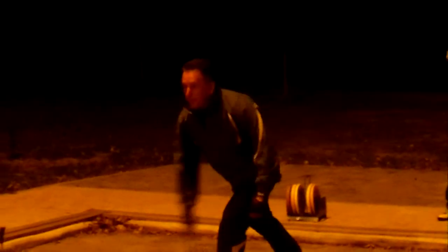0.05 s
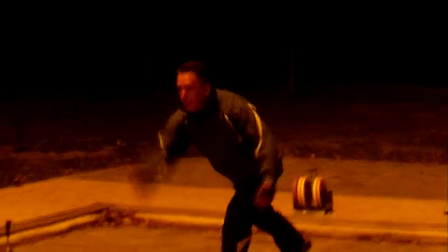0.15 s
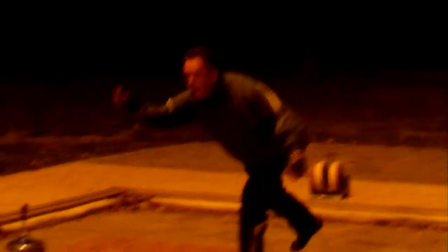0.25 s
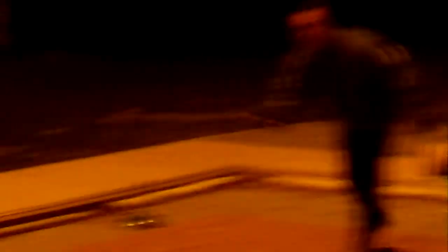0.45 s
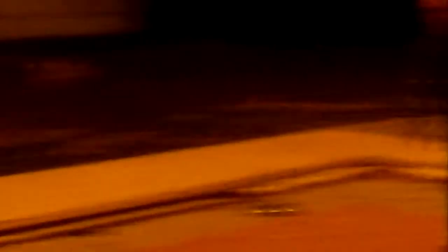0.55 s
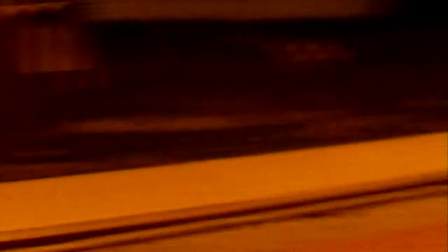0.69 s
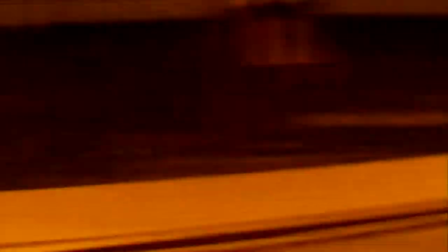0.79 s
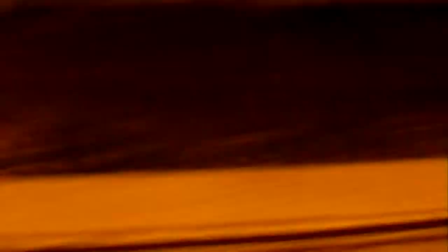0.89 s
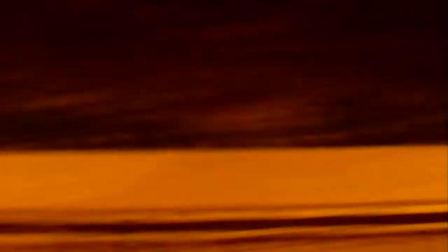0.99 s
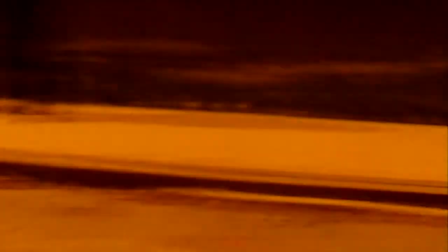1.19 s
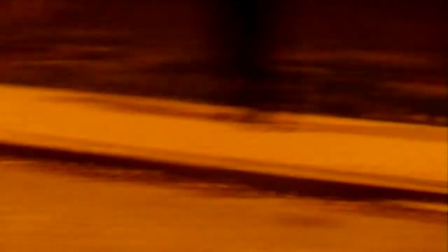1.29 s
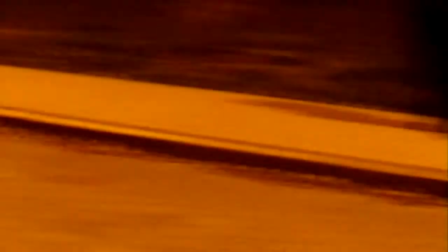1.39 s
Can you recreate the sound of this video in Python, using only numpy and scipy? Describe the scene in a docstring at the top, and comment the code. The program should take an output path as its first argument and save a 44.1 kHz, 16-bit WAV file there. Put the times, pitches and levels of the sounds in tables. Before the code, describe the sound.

A heavy object hits paved ground with a sharp double knock, bounces lightly a few times, then slides away in dry clacks and short gritty scrapes. It is outdoors, with a faint echo and a low background rumble.

```python
"""A heavy object is bowled along paved ground, outdoors at night. It lands with a double knock, bounces
a few times, then skitters away in dry clacks and short gritty scrapes over the soft rush of its slide.
Each impact excites damped resonances and sets the object's normal modes ringing briefly. The ground
scatters the knocks and scrapes, a faint echo follows, and a low rumble lies beneath."""
import sys
import numpy as np
from scipy import signal
from scipy.fft import rfft, irfft
from scipy.io import wavfile

SR = 44100
rng = np.random.default_rng(int(sys.argv[2]) if len(sys.argv) > 2 else 0)


def dump_mix(stems):
    """Bounce the given channels to the path in sys.argv[1] as a 16-bit WAV at rate SR."""
    frames = np.atleast_2d(stems).T  # one column per channel
    limited = np.clip(frames, -1, 1)  # hard clip at full scale
    pcm = np.round(limited * 32767).astype(np.int16)
    wavfile.write(sys.argv[1], SR, pcm)


N = 63945
T = np.arange(N) / SR

# spectrum of the outdoor background: f/Hz, level/dB
AMBIENT_SPECTRUM = [(20, -6.5), (55, -1.5), (90, -12.5), (150, -16.5), (310, -22), (510, -30), (870, -29.5),
                    (1700, -36.5), (5700, -52), (11400, -51.5), (16000, -61)]
# spectrum of the distant echo: f/Hz, level/dB
ECHO_SPECTRUM = [(200, -29), (500, 12.5), (900, -18), (1400, 6), (4000, 3.5), (9000, 2), (15000, 2)]
# envelope of the sliding friction: t/s, level/dB
FRICTION_ENVELOPE = [(.24, -78), (.31, -58), (.42, -49), (.55, -49), (.8, -53.5), (1.1, -53.5),
                     (1.45, -53.5)]
# spectrum of the sliding friction: f/Hz, level/dB
FRICTION_SPECTRUM = [(100, 2), (190, 1.5), (290, 0.5), (470, -11), (700, -9), (890, -1), (1250, -12.5),
                     (2000, -10.5), (2600, -25), (3700, -17.5), (8000, -30), (15000, -61)]
# scrapes over grit: t/s, duration/s, level/dB
SCRAPE_EVENTS = [(0.411, 0.01, -36.5), (0.53, 0.0034, -47), (0.541, 0.0054, -37.5), (0.667, 0.014, -43.5),
                 (.769, 0.0082, -44), (.8062, 0.0013, -30), (.816, 0.0059, -41.5), (0.903, 0.014, -36),
                 (.963, 0.0072, -43.5), (1.009, 0.0048, -33.5), (1.033, 0.0056, -45),
                 (1.111, 0.0021, -33.5), (1.115, 0.0077, -46), (1.166, 0.0068, -39.5),
                 (1.229, 0.00073, -35.5), (1.255, 0.0038, -39.5), (1.282, 0.0073, -42),
                 (1.303, 0.0023, -37.5), (1.317, 0.0053, -37)]
# spectrum of a scrape: f/Hz, level/dB
SCRAPE_SPECTRUM = [(300, 4.5), (900, -10), (1400, 3), (2100, -5.5), (2700, 1), (3700, -5.5), (5000, -4.5),
                   (6600, -2), (10000, -4.5), (15000, -32)]
# upper bands of an impact (crack, bite, edge): f/Hz, bandwidth/Hz
UPPER_BANDS = [(2120, 914), (3700, 1320), (7400, 4700)]
# normal modes of the object: f/Hz, level/dB relative to the impact at that frequency, T60/s
NORMAL_MODES = [(260, -22, 0.056), (623, -6, 0.039), (705, -9, 0.073), (831, -2.5, 0.085),
                (913, -14.5, 0.16), (1061, -8, 0.054), (1520, 0.5, 0.026), (2010, -14, 0.12)]
# peaks and dips of the shell while off the ground: f/Hz, bandwidth/Hz, gain/dB
SHELL_RESONANCES = [(1947, 84, 7), (2660, 910, -3), (3684, 200, 6.5), (3980, 570, -6), (5260, 163, 6),
                    (6680, 260, 7)]
# impacts while sliding: t/s, crunch duration/s, body f/Hz, level/dB of thump, body, crack, bite, edge
SLIDING_IMPACTS = [(0.4494, 0.0017, 785, -36.5, -47.5, -35, -50, -47),
                   (0.5125, 0.0031, 1070, -41, -44, -51, -50, -54),
                   (0.5235, 0.006, 820, -41.5, -47, -40, -44, -38),
                   (0.5612, 0.0017, 870, -40, -44.5, -50.5, -68, -50),
                   (0.612, 0.0037, 865, -38, -48.5, -52, -38.0, -44),
                   (0.6329, 0.0022, 795, -32.0, -44, -39.5, -36.5, -35.5),
                   (0.6668, 0.0056, 876, -35, -36.5, -43, -42.5, -38),
                   (0.7088, 0.0006, 940, -41, -43.5, -37.5, -47, -44),
                   (0.7268, 0.0056, 1010, -42, -52, -34.5, -41, -41),
                   (0.7358, 0.0049, 835, -40, -43.5, -36, -54, -40),
                   (0.7572, 0.0029, 930, -45, -44.5, -50, -55, -55.0),
                   (0.7795, 0.0041, 970, -45.5, -43, -45.5, -48.5, -49.5),
                   (0.8078, 0.0034, 1110, -57, -45, -48, -33.5, -41.5),
                   (0.8145, 0.0027, 1110, -59, -63, -42.5, -56, -40),
                   (0.8723, 0.0022, 830, -35.5, -46, -40.5, -44.5, -36.5),
                   (0.9028, 0.00097, 870, -34.5, -44, -30.5, -45, -40.5),
                   (0.9677, 0.00082, 900.0, -41.5, -36.5, -40, -47, -50),
                   (1.0018, 0.0019, 880, -37.0, -43.5, -40.5, -38.5, -42.5),
                   (1.0755, 0.0049, 770, -42.5, -46, -43.5, -56, -50),
                   (1.0992, 0.0064, 970, -36, -34, -40, -44, -41.5),
                   (1.1405, 0.0036, 740, -40, -53.5, -52.5, -52.5, -51.5),
                   (1.1808, 0.0043, 1010, -36.5, -48, -40.5, -38, -41.5),
                   (1.2008, 0.0018, 1170, -43, -56, -49, -50, -53),
                   (1.2425, 0.0051, 870, -48, -51, -45.5, -48.5, -44),
                   (1.3087, 0.0047, 780, -59, -41, -42.0, -54, -37),
                   (1.341, 0.0012, 890, -36.0, -36.5, -39.5, -43, -43.5),
                   (1.387, 0.0043, 777, -35, -36, -38.0, -40.5, -37.5),
                   (1.445, 0.0021, 1020, -46, -51, -47, -53, -51)]
# landing and bounces: t/s, crunch duration/s, body f/Hz, level/dB of thump, body, crack, bite, edge
LANDING_IMPACTS = [(0.2358, 0.00097, 760, -28, -33.5, -40, -24.5, -29.5),
                   (0.2392, 0.0016, 1310, -40, -28, -35.5, -47, -52),
                   (0.2442, 0.0074, 930, -40, -26, -32, -33.5, -38),
                   (0.2584, 0.0014, 750, -17, -23.5, -32.5, -22.5, -30),
                   (0.2602, 0.0008, 940, -26, -16, -25.5, -28.5, -31),
                   (0.2694, 0.0014, 920, -62, -30.5, -35.5, -36, -45),
                   (0.279, 0.0031, 885, -40, -30, -38.5, -42, -48),
                   (0.3108, 0.008, 910, -40.5, -39, -44, -46, -46),
                   (0.3365, 0.017, 980, -39, -40, -42.5, -49, -50.5),
                   (0.3805, 0.0065, 910, -67, -38.5, -61, -52, -54.5),
                   (0.4095, 0.002, 820, -51.5, -38.5, -39, -34.5, -47.5),
                   (0.4122, 0.001, 850, -39.5, -49, -35.5, -65, -63)]

THUMP_HZ = 261.2
CRUNCH_DB = (-20, -12, 1.5, 1.5, 6)   # crushed grit relative to the clean tick, from thump to edge


def from_db(db):
    """Amplitude ratio of a level in decibels."""
    return 10 ** (np.asarray(db) / 20)


def unit_rms(x):
    """Normalisation to unit mean power."""
    return x / np.sqrt(np.mean(x ** 2) + 1e-20)


def unit_energy(x):
    """Normalisation to a unit sum of squares."""
    return x / np.sqrt(np.sum(x ** 2) + 1e-20)


def colour(x, spectrum):
    """Spectral weighting by (f/Hz, level/dB) points, with infrasound attenuated; unit rms."""
    hz, db = np.transpose(spectrum)
    f = np.fft.rfftfreq(len(x), 1 / SR) + 1
    gain = from_db(np.interp(np.log(f), np.log(hz), db))
    return unit_rms(irfft(rfft(x) * gain * f / np.hypot(f, 15), len(x)))


def add(out, start_s, x):
    """Superposition of x on out from a given time."""
    i = int(np.clip(start_s * SR, 0, N - 1))
    out[i:i + len(x)] += x[:N - i]


def grit(size, spread_db=4.5):
    """Granular noise: dense grains with a log-normal spread of strength."""
    return rng.standard_normal(size) * from_db(spread_db * rng.standard_normal(size))


def resonance(x, hz, width_hz):
    """A damped resonance acts as a band-pass filter: the wider the band, the faster the decay."""
    low = np.clip(np.hypot(hz, width_hz / 2) - width_hz / 2, 20, .4 * SR)
    high = min(low + width_hz, .45 * SR)
    return signal.sosfilt(signal.butter(2, [low, high], "band", fs=SR, output="sos"), x + 1e-18)


def background(whine_hz=12300):
    """Ambient noise: a broadband rumble and faint hiss, with a thin pure tone."""
    rumble = from_db(-45) * colour(rng.standard_normal(N), AMBIENT_SPECTRUM)
    whine = from_db(-78) * np.sqrt(2) * np.sin(2 * np.pi * whine_hz * T)
    return rumble + whine


def reflections(x, near_t60_s=.05, far_t60_s=1, build_s=.041):
    """Convolution with an impulse response: quick scatter from nearby ground and a faint, long echo."""
    near = colour(rng.standard_normal(N), [(650, -20), (1300, 0)]) * from_db(-60 * T / near_t60_s)
    far = colour(rng.standard_normal(N), ECHO_SPECTRUM) * from_db(-60 * T / far_t60_s)
    far *= 1 - np.exp(-T / build_s)
    response = from_db(-15) * unit_energy(near) + from_db(-23) * unit_energy(far)
    return signal.fftconvolve(x, response)[:N]


def sliding_friction(flutter_db=6.5, flutter_hz=38):
    """Friction noise: the underside rubs on the paving in a hollow rush whose level flutters."""
    flutter = colour(rng.standard_normal(N), [(flutter_hz, 0), (10 * flutter_hz, -50)])
    level_db = np.interp(T, *np.transpose(FRICTION_ENVELOPE)) + flutter_db * flutter
    return from_db(level_db) * colour(grit(N), FRICTION_SPECTRUM)


def scrapes(catch_db=16):
    """Intermittent friction: an edge catches with a tick, then drags over grit in a bright burst."""
    envelope, grains = np.zeros(N), unit_rms(grit(N))
    for start_s, duration_s, db in SCRAPE_EVENTS:
        from_centre = (T - start_s - duration_s / 2) / (0.59 * duration_s)
        envelope += from_db(db) * np.exp(-from_centre ** 4)
        add(grains, start_s, from_db([catch_db]))
    return envelope * colour(grains, SCRAPE_SPECTRUM)


def contacts(impacts, thump_width_hz, body_width_hz):
    """Impulsive excitation: a sharp tick and a brief crunch of grit drive five damped resonances."""
    out, t = np.zeros(N), T[:SR // 20]
    tick = t == 0
    window_gain = np.sqrt(.01 * SR)   # band levels state the energy as an rms over 10 ms
    for start_s, crunch_s, body_hz, *levels_db in impacts:
        crunch = unit_energy(grit(len(t)) * np.exp(-(t / crunch_s) ** 2) * (t > 0))
        bands = [(THUMP_HZ, thump_width_hz), (body_hz, body_width_hz), *UPPER_BANDS]
        for k, (hz, width_hz) in enumerate(bands):
            force = tick + from_db(CRUNCH_DB[k]) * crunch
            response = unit_energy(resonance(force, hz, width_hz))
            polarity = -(-1) ** k
            add(out, start_s, polarity * from_db(levels_db[k]) * window_gain * response)
    return out


def modal_ring(impacts):
    """Free vibration: each mode decays exponentially from a level set by the impact at its frequency."""
    out, t = np.zeros(N), T[:SR // 4]
    for start_s, _, body_hz, *levels_db in impacts:
        centres_hz = [THUMP_HZ, body_hz, *(hz for hz, _ in UPPER_BANDS)]
        for k, (hz, db, t60_s) in enumerate(NORMAL_MODES):
            onset_db = np.interp(hz, centres_hz, levels_db) + db + rng.standard_normal()
            envelope = from_db(onset_db - 60 * t / t60_s)
            add(out, start_s, (-1) ** k * envelope * np.sin(2 * np.pi * hz * t))
    return out


def shell(x):
    """Resonant filtering: the shell's quickly damped resonances colour a blow."""
    for hz, width_hz, db in SHELL_RESONANCES:
        band = signal.lfilter(*signal.iirpeak(hz, hz / width_hz, fs=SR), x + 1e-18)
        x = x + (from_db(db) - 1) * band
    return x


def clacks(ring_db=-6):
    """Contact damping: lying on the ground, the object rings more weakly, so its impacts sound dry."""
    ticks = contacts(SLIDING_IMPACTS, thump_width_hz=118, body_width_hz=274)
    return ticks + from_db(ring_db) * modal_ring(SLIDING_IMPACTS)


def landing():
    """Impact and rebound: each knock is coloured by the shell and leaves the object ringing freely."""
    knocks = contacts(LANDING_IMPACTS, thump_width_hz=161, body_width_hz=324)
    return shell(knocks) + modal_ring(LANDING_IMPACTS)


def scene():
    """Superposition of the transients, their reflections, the slide and the background, in mono."""
    transients = landing() + clacks() + scrapes()
    return (transients + reflections(transients) + sliding_friction() + background())[None]


def record(dry, ceiling=0.94, cutoff_hz=16000):
    """Soft saturation rounds the loudest peaks; a low-pass filter limits the bandwidth."""
    rounded = ceiling * np.tanh(dry / ceiling)
    return signal.sosfilt(signal.ellip(10, .2, 70, cutoff_hz, fs=SR, output="sos"), rounded)


dry = scene()
out = record(dry)
dump_mix(out)
```